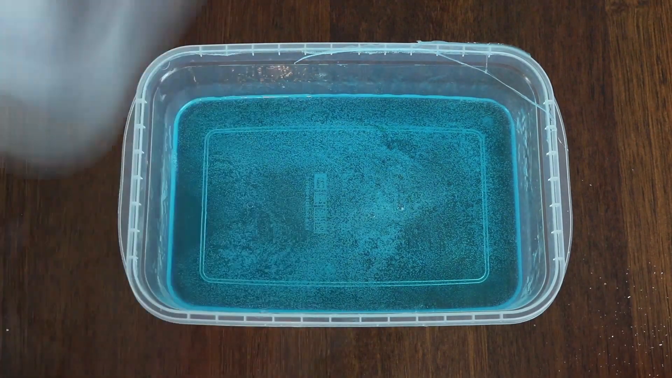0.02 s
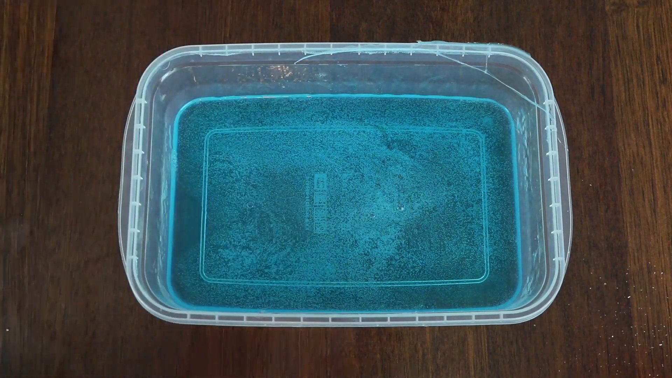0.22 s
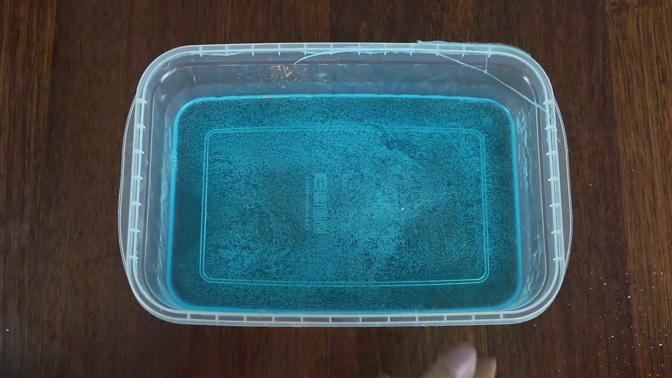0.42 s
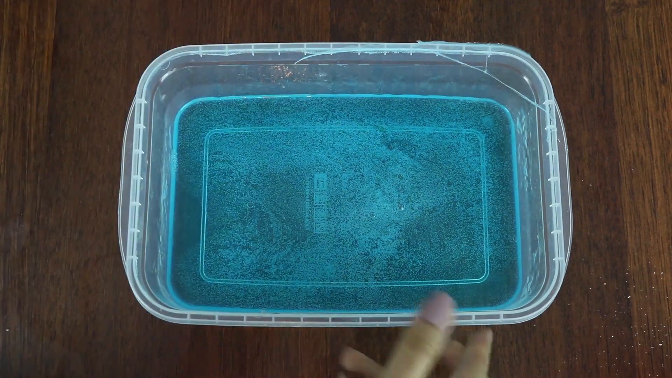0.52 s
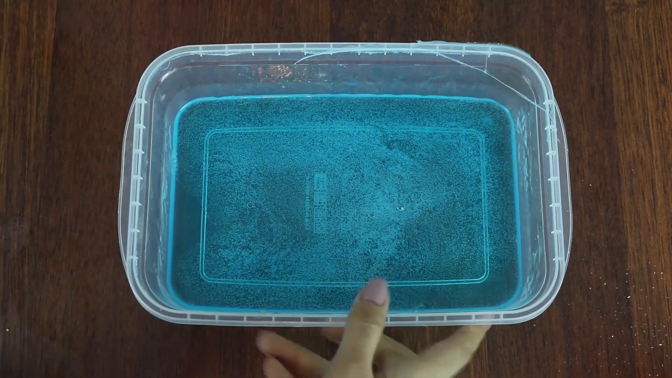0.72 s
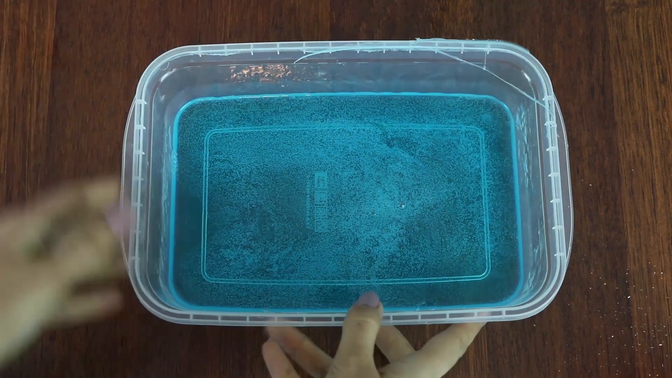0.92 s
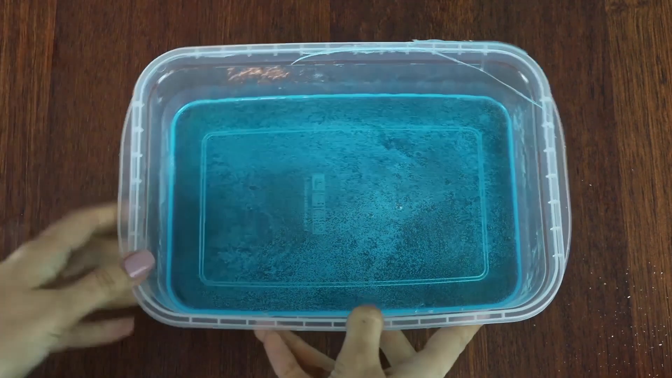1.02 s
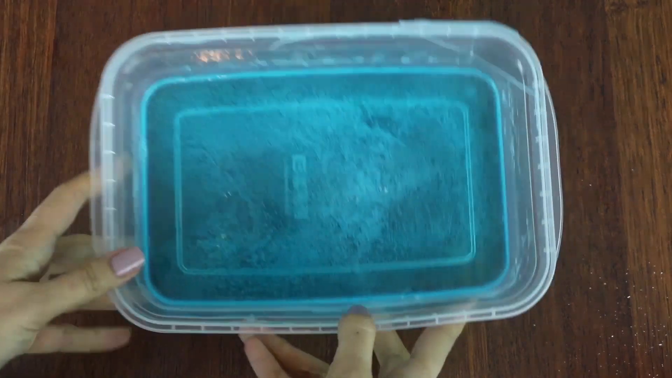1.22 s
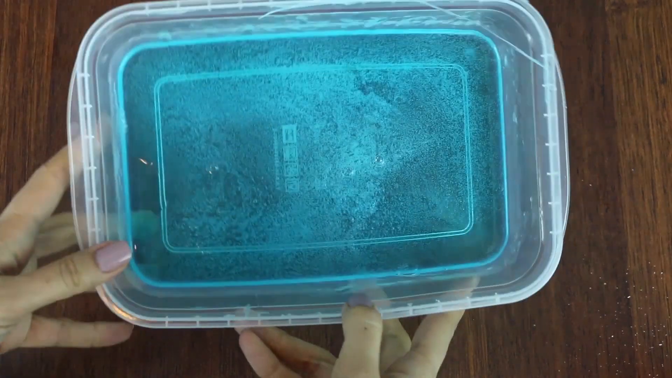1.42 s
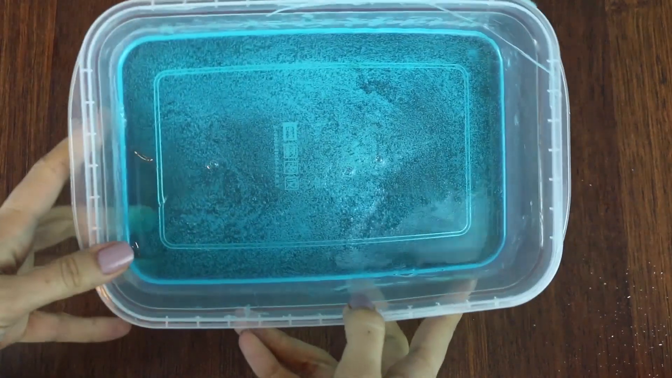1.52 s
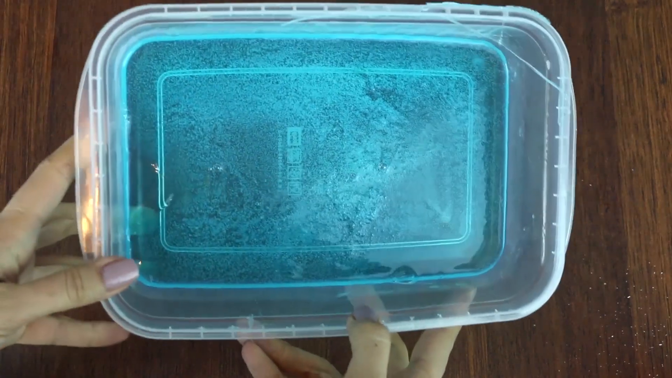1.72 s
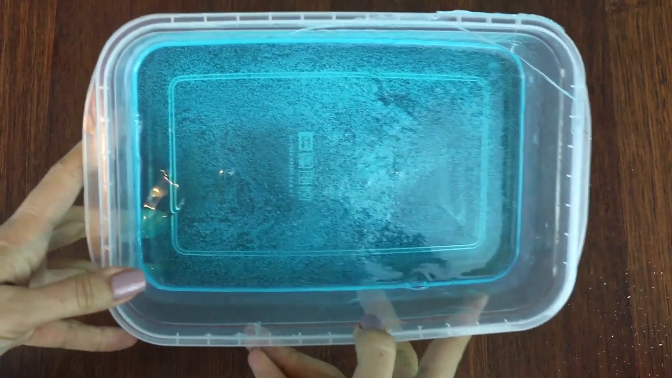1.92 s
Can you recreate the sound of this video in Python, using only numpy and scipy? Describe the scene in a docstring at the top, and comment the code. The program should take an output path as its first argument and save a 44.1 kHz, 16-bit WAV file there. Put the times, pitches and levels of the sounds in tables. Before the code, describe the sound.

In a hard-walled room, a plastic tub's snap-on lid cracks loose twice, then pops free, slightly distorting the microphone. Soft rubbing, dull bumps on a wooden table, tiny crackles and light fingertip taps follow.

```python
"""A plastic tub on a wooden table in a live, hard-walled room, heard through one microphone.
The room is still ringing from a snap as hands rub and tap the tub and pry at its snap-on lid.
The rim lets go in sharp snaps, then in one ringing pop at 0.7 s; these overload the microphone.
Afterwards the tub bumps and slides on the table, the plastic crackles and fingers tap it lightly.
Room air, a low rumble and a faint hum lie under it all."""
import sys
import numpy as np
from scipy import signal
from scipy.fft import rfft, irfft, next_fast_len
from scipy.io import wavfile
from scipy.ndimage import uniform_filter1d

SR = 44100
rng = np.random.default_rng(int(sys.argv[2]) if len(sys.argv) > 2 else 0)


def transcribe(signal):
    """Save signal, clipped to [-1, 1], as a 16-bit WAV file at the path in sys.argv[1]."""
    frames = np.atleast_2d(signal).T
    limited = np.clip(frames, -1, 1)
    pcm = np.round(limited * 32767).astype(np.int16)
    wavfile.write(sys.argv[1], SR, pcm)


N = 88200
T = np.arange(N) / SR
HANDLING_ROOM_DB = -5  # reverberation against direct sound at the microphone


def snaps():
    """Each release splits, cracks, rings the rim and flexes the panel; the room answers in kind."""
    # releases of the rim: (time [s], level [dB], crack [dB], bass [dB], rim ring [dB],
    # rim pitch [semitones], rim t60 [s], panel centre [Hz], panel [dB], room [dB], standing waves [dB])
    releases = [(-.09, -11.5, -2.5, 7, -30.5, 0, 0.018, 700, 4, -7, -7),
                (0.2333, 2.5, 0.5, 6, -10.5, 0.59, 0.06, 397.4, -3, -6.5, 3.5),
                (0.4963, 0, 3, 3, 4.5, -0.99, .017, 711, -2.5, -8.5, 1.5),
                (0.6915, -8.5, 0, 1, -7, -0.93, .008, 1172, 3, -8, -12),
                (0.7132, -7, -17.5, 4, 2, 0.96, .012, 1200, -2.5, -7, -12),
                (0.7163, 9.5, 5.5, -2.5, 1, -0.25, .075, 1150, -19.5, -7.5, -12)]
    # colour of the crack: (frequency [Hz], level [dB])
    crack_colour = [(40, -12.5), (200, -1.5), (420, 2), (750, 4), (1800, 7), (2600, 1), (5000, 3),
                    (8000, -4), (15000, -14)]
    out = np.zeros(N)
    burst = fade(t60=0.049)
    split_band = lambda hz: hz / np.hypot(hz, 1500) / np.hypot(1, hz / 6000)  # 1.5 to 6 kHz
    for (s, db, crack_db, bass_db, rim_db, semitones, rim_t60,
         panel_hz, panel_db, room_db, standing_db) in releases:
        colour = lambda hz: amp(crack_db - 1 + along(crack_colour, hz) + bass_db / (1 + (hz / 740) ** 2))
        crack_band = lambda hz: colour(hz) / np.hypot(1, (hz / 8800) ** 2)
        split = amp(crack_db + 2.5) * filtered(rng.standard_normal(N), split_band) * fade(t60=0.002)
        crack = filtered(rng.standard_normal(N), crack_band) * burst
        rim = amp(rim_db) * lid_rim(semitones, rim_t60)
        direct = split + crack + rim + amp(panel_db) * lid_panel(panel_hz)
        # the reverberation takes the broad colour of crack and rim together
        radiated = lambda hz: np.sqrt(colour(hz) ** 2 * np.sum(burst ** 2) + blurred_power(rim, hz))
        tail = amp(room_db) * filtered(room_tail(), radiated)
        add(out, s, amp(db) * (direct + tail + amp(standing_db) * standing_waves()))
    return out


def lid_rim(semitones, t60):
    """The freed rim rings in a cluster of bright modes."""
    # modes of the rim: (frequency [Hz], level [dB], share of t60 [ratio])
    modes = [(1720, -22, 0.2), (1725, 0.5, 0.91), (1927, -4.5, 1), (2158, -5, 0.58), (3054, -3, 0.34),
             (3400, -11, 0.85), (4840, -8, 1), (5010, -13, 0.89)]
    pitch = 2 ** (semitones / 12)
    return sum((-1) ** k * amp(db) * ring(hz * pitch, t60 * share)
               for k, (hz, db, share) in enumerate(modes))


def lid_panel(centre_hz, span_octaves=0.62, swell_cycles=2, t60_cycles=13):
    """The flat of the lid flexes, most strongly in the modes near centre_hz."""
    # modes of the panel: (frequency [Hz], level [dB])
    modes = [(265, 0), (385, -3.5), (570, -4), (735, 3), (950, -3.5), (1170, -10.5)]
    out = np.zeros(N)
    for k, (hz, db) in enumerate(modes):
        drive = 1 / np.hypot(1, (np.log2(hz / centre_hz) / span_octaves) ** 2)
        swell = 1 - np.exp(-T * hz / swell_cycles)
        out += (-1) ** k * 2 * amp(db) * drive * swell * ring(hz, t60_cycles / hz)
    return out


def bumps():
    """The tub knocks dully on the wood, one damped mode a knock."""
    # knocks on the table: (time [s], level [dB], frequency [Hz], t60 [s])
    knocks = [(0.888, -37.5, 63.6, 0.33), (1.055, -11.5, 599, 0.01), (1.061, -12.5, 255, 0.018),
              (1.078, -17, 355, 0.022), (1.087, -14.5, 67.3, 0.06)]
    out = np.zeros(N)
    for s, db, hz, t60 in knocks:
        add(out, s, amp(db) * ring(hz, t60))
    return out


def slide(slips_per_s=3300, spread_db=1):
    """Hands rub and slide the tub: tiny random slips excite its walls."""
    # course of the rubbing: (time [s], level [dB])
    course = [(0, -54.5), (.2, -47), (.3, -36.5), (.86, -38), (.95, -38), (1.03, -41.5), (1.14, -41),
              (1.21, -36), (1.27, -46), (1.335, -44), (1.41, -75), (1.52, -71), (1.59, -56), (1.68, -72.5),
              (2, -61.5)]
    # colour of the sliding: (frequency [Hz], level [dB])
    colour = [(60, -7.5), (175, -21), (240, -0.5), (370, 0.5), (530, -11), (680, -5.5), (980, -7),
              (1350, -18), (3000, -19), (5600, -21), (9000, -33.5), (15000, -40.5)]
    slips = (rng.random(N) < slips_per_s / SR) * rng.choice([-1, 1], N)
    slips = slips * amp(spread_db * rng.standard_normal(N))
    level_db = np.interp(T, *np.transpose(course))
    return amp(level_db) * unit(filtered(slips, lambda hz: amp(along(colour, hz))))


def taps():
    """The fingertip thuds on the tub's wall and rings its edge; the nail adds a bright tick."""
    # light finger taps: (time [s], wall thud [dB], edge ring [dB], nail tick [dB])
    touches = [(.123, -66, -39, -55), (.204, -55, -64, -35), (1.112, -48, -58, -33.5),
               (1.168, -53, -34, -47), (1.289, -88, -53, -52), (1.358, -46, -36.5, -48.5),
               (1.366, -35, -68, -61.5), (1.375, -33.5, -37.5, -34.5), (1.619, -63.5, -44, -64),
               (1.712, -45.5, -43.5, -56), (1.721, -41.5, -62.5, -64)]
    # modes of the walls, the stiff edge and the edge under a nail: (frequency [Hz], level [dB], t60 [s])
    wall_modes = [(240.5, -13.5, .13), (334, -5.5, 0.079), (377, 6, .06), (491.5, -13, 0.038)]
    edge_modes = [(980, -1, .035), (1745, -9.5, 0.43), (1836, -1.5, 0.073), (2080, -8, 0.022)]
    nail_modes = [(3330, -8, 0.027), (4554, -10, 0.05), (4900, -12.5, 0.058), (5030, -11, 0.04),
                  (5330, -6, 0.017)]
    tips, nails = np.zeros(N), np.zeros(N)
    for s, thud_db, edge_db, nail_db in touches:
        tick = amp(-13) * rng.standard_normal(N) * fade(t60=0.012)
        add(tips, s, amp(thud_db) * struck(wall_modes) + amp(edge_db) * struck(edge_modes))
        add(nails, s, amp(nail_db) * (struck(nail_modes) + tick))
    return in_room(tips, HANDLING_ROOM_DB) + in_room(nails, room_db=-4)


def crackles():
    """The plastic relaxes in tiny ticks with no ring of their own."""
    # ticks of the plastic: (time [s], level [dB])
    ticks = [(.997, -47), (1.003, -47.5), (1.046, -50), (1.057, -45), (1.076, -48.5), (1.1125, -41.5),
             (1.171, -46), (1.212, -53), (1.245, -56), (1.359, -53.5)]
    # colour of a tick: (frequency [Hz], level [dB])
    colour = [(500, -25), (3000, -6), (6000, -1.5), (12500, -0.5), (16000, -4.5)]
    out = np.zeros(N)
    for s, db in ticks:
        add(out, s, amp(db) * noise(colour) * fade(t60=0.016))
    return in_room(out, HANDLING_ROOM_DB)


def standing_waves(swell_s=0.012):
    """Low resonances build up between the hard walls and ring on."""
    # modes of the room: (frequency [Hz], level [dB], t60 [s])
    modes = [(75.1, -40.5, 0.58), (147, -29, .4), (188.8, -35.5, 1.2), (257, -38.5, 0.82),
             (742, -21.5, 0.36)]
    waves = sum((-1) ** k * amp(db) * ring(hz, t60) for k, (hz, db, t60) in enumerate(modes))
    return waves * (1 - np.exp(-T / swell_s))


def room_tail(build_s=0.0015):
    """Diffuse reflections of energy 1, each band dying at its own rate."""
    # decay of the room: (frequency [Hz], t60 [s])
    decay = [(100, 0.8), (260, 0.1444), (700, 0.4383), (1800, 0.7623), (4800, 0.62), (8000, 0.56),
             (13000, 0.37)]
    # colour of the room: (frequency [Hz], level [dB])
    colour = [(60, -13.5), (115, -13.5), (175, 3.5), (300, -8), (380, 4.5), (490, -1), (700, 3), (950, 1.5),
              (1300, 1.5), (1750, -3), (2100, 0.5), (5000, -1), (8000, -4), (14000, -9)]
    hz, t, bands = signal.stft(rng.standard_normal(N), SR, nperseg=256)
    bands *= amp(along(colour, hz)[:, None] - 60 * t / along(decay, hz)[:, None])
    tail = signal.istft(bands, SR, nperseg=256)[1][:N] * (1 - np.exp(-T / build_s))
    return tail / np.linalg.norm(tail)


def in_room(x, room_db):
    """What reaches the microphone: the direct sound plus its reverberation."""
    return x + amp(room_db) * signal.fftconvolve(x, room_tail())[:N]


def room_tone(hum_hz=242):
    """Air, the low rumble of the building and a faint steady hum."""
    # colours of the air and the rumble: (frequency [Hz], level [dB])
    air = [(24, -54.5), (40, -18.5), (241, -3), (280, -15), (461, -9.5), (758, -15.5), (15500, -29)]
    rumble = [(20, 1.5), (35, -2.5), (52, -6.5), (75, 1.5), (120, -8), (250, -28.5), (1000, -72)]
    hum = np.sqrt(2) * np.sin(2 * np.pi * hum_hz * T)
    return amp(-54.5) * noise(air) + amp(-62) * noise(rumble) + amp(-60.5) * hum


def struck(modes):
    """Modes ring together in alternating polarity, their levels varying by about 1 dB a strike."""
    return sum((-1) ** k * amp(db + rng.normal(0, 1)) * ring(hz, t60)
               for k, (hz, db, t60) in enumerate(modes))


def ring(hz, t60):
    """One struck mode, swelling over its first half cycle."""
    return np.sin(2 * np.pi * hz * T) * fade(t60) * (1 - np.exp(-2 * T * hz))


def fade(t60):
    """Exponential decay, 60 dB in t60 seconds."""
    return amp(-60 * np.minimum(T / t60, 5))


def blurred_power(x, hz, blur_hz=272):
    """Energy spectrum of x as radiated in all directions: narrow peaks and notches even out."""
    power = uniform_filter1d(np.abs(rfft(x)) ** 2, int(blur_hz * N / SR))
    return np.interp(hz, np.fft.rfftfreq(N, 1 / SR), np.abs(power))


def noise(colour):
    """Coloured noise of rms 1."""
    return unit(filtered(rng.standard_normal(N), lambda hz: amp(along(colour, hz))))


def filtered(x, response):
    """x shaped by a gain that depends on frequency."""
    size = next_fast_len(N + 8192)
    return irfft(rfft(x, size) * response(np.fft.rfftfreq(size, 1 / SR)), size)[:N]


def along(points, hz):
    """Interpolate (frequency [Hz], value) points on a log axis."""
    freqs, values = np.transpose(points)
    return np.interp(np.log(hz + 1), np.log(freqs + 1), values)


def amp(db):
    """Decibels to gain."""
    return 10 ** (np.asarray(db) / 20)


def unit(x):
    """Scaled to rms 1."""
    return x / np.sqrt(np.mean(x ** 2) + 1e-20)


def add(track, s, sound):
    """Mix a sound in from time s, which may be negative."""
    i = round(s * SR)
    part = sound[max(-i, 0):N - max(i, 0)]
    track[max(i, 0):][:len(part)] += part


def scene():
    """Lid, handling and room tone at one microphone position."""
    tub = snaps() + taps() + in_room(bumps() + slide(), HANDLING_ROOM_DB)
    return (tub + room_tone() + crackles())[None]


def record(dry):
    """The microphone clips on the snaps and passes nothing above its band limit."""
    hardness, top_hz = 8, 15900
    clipped = dry[0] / (1 + np.abs(dry[0]) ** hardness) ** (1 / hardness)
    return filtered(clipped, lambda hz: hz < top_hz)[None]


dry = scene()
out = record(dry)
transcribe(out)
```